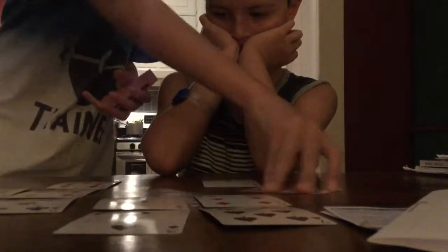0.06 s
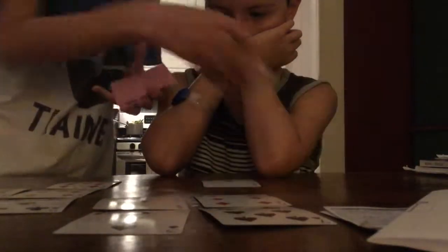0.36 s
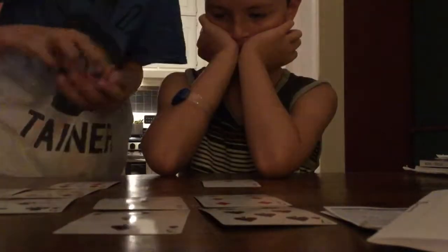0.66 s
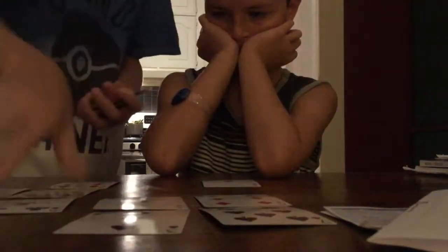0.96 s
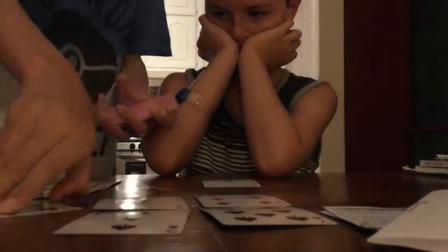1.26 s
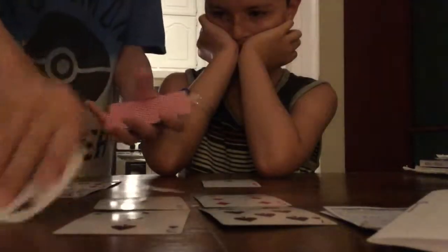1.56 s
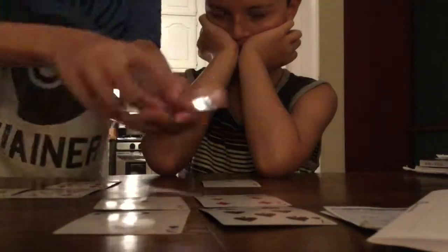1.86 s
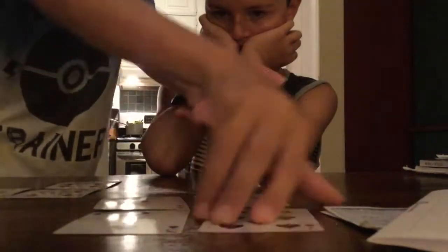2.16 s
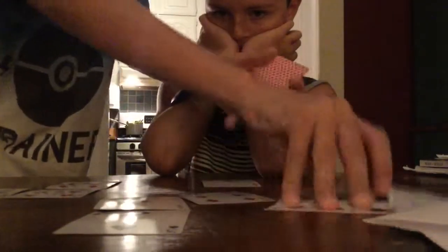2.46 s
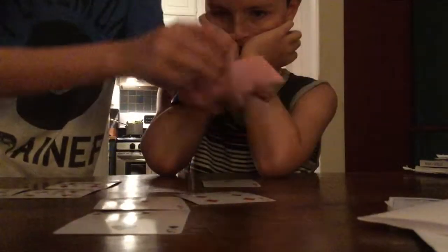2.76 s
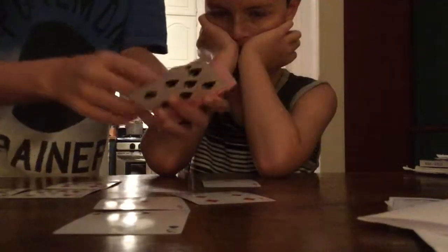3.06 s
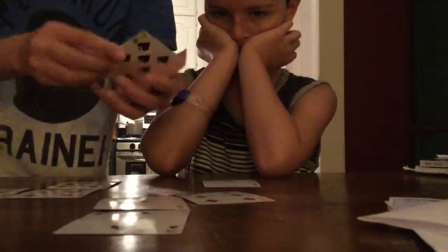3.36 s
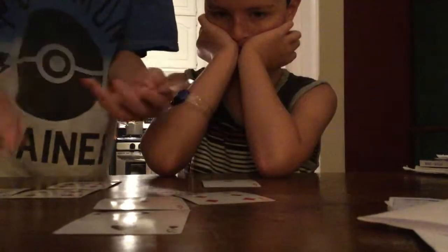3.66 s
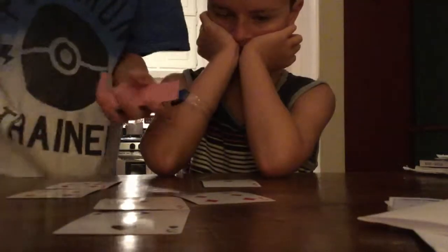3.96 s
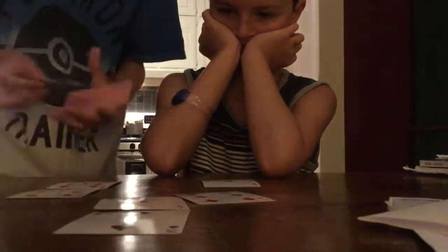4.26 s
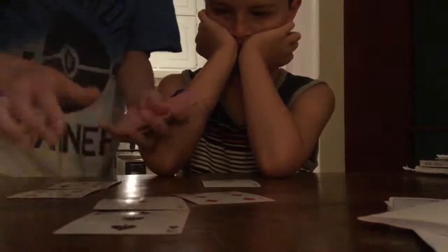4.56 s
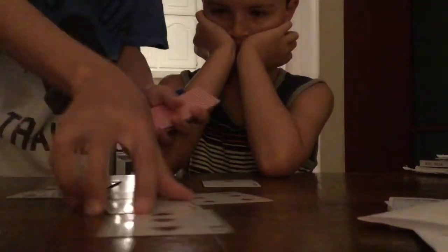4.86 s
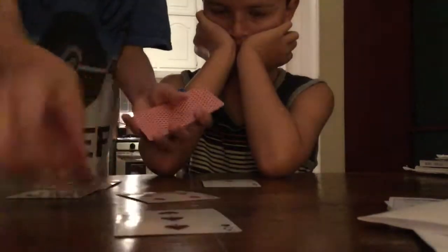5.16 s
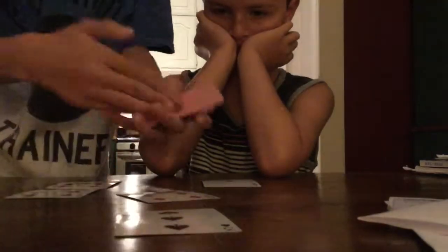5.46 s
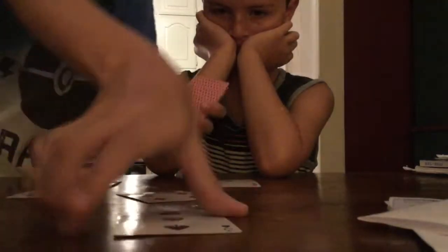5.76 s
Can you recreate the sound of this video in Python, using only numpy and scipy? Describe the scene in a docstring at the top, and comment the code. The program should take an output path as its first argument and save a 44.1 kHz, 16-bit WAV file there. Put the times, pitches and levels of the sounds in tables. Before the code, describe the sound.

Soft finger knocks, short slides and crisp flicks as playing cards are picked up from a wooden table in a small room.

```python
"""Gathering playing cards

Cards are picked up one by one from a wooden table in a small, hard-walled room. Fingers land on the
wood and drag a card along, hissing. Its edge scrapes, flicks free and snaps, the bent card flaps, and
it is rubbed into the pack in the other hand. The room hums faintly and rings after each snap."""
import sys
import numpy as np
from scipy import signal
from scipy.fft import rfft, irfft
from scipy.io import wavfile
from scipy.ndimage import uniform_filter1d

SR = 44100
rng = np.random.default_rng(int(sys.argv[2]) if len(sys.argv) > 2 else 0)


def transcribe(signal):
    """Save signal, clipped to [-1, 1], as a 16-bit WAV file at the path in sys.argv[1]."""
    frames = np.atleast_2d(signal).T
    limited = np.clip(frames, -1, 1)
    pcm = np.round(limited * 32767).astype(np.int16)
    wavfile.write(sys.argv[1], SR, pcm)


N = 255780
HZ = np.fft.rfftfreq(N, 1 / SR)
TIME = np.arange(N) / SR

# the tone of a scraping card: (frequency [Hz], level [dB])
SCRAPE_TONE = [(60, -33.5), (160, -11.5), (350, -15), (750, -6.5), (1150, -6), (1700, -2.5), (3000, 1),
               (4200, 0), (7000, -4), (10000, -7), (16000, -13)]


def amp(db):
    """Turns decibels into a number to multiply a sound by."""
    return 10 ** (np.asarray(db) / 20)


def unit(x):
    """Scales a sound to an average strength (rms) of 1."""
    return x / np.sqrt(np.mean(x ** 2) + 1e-20)


def read(points, hz):
    """Looks up frequencies in a table, sliding between its rows on a musical (log) scale."""
    f, value = np.transpose(points)
    return np.interp(np.log(hz + 1), np.log(f + 1), value)


def add(mix, s, sound):
    """Mixes a sound in, starting at s seconds."""
    start = round(s * SR)
    sound = sound[max(-start, 0):]
    part = mix[max(start, 0):][:len(sound)]
    part += sound[:len(part)]


def shaped(x, gain):
    """Turns each frequency of a sound up or down, then scales the result to strength 1."""
    return unit(irfft(rfft(x) * gain, len(x)))


def click(gain_db):
    """A click with the given tone that starts at once and peaks at 1 (a minimum-phase pulse)."""
    cepstrum = irfft(np.log(amp(gain_db)))
    half = len(cepstrum) // 2
    folded = np.r_[cepstrum[0], 2 * cepstrum[1:half], np.zeros(half)]
    pulse = irfft(np.exp(rfft(folded)))[:half]
    return pulse / abs(pulse).max()


def background(air_db=-69.5, hum_db=-72, hum_hz=159, hum_width_hz=14):
    """Quiet room air with a low, unsteady hum."""
    # the tone of the air: (frequency [Hz], level [dB])
    air_tone = [(30, -36.5), (70, -32), (110, -27.5), (160, 2.5), (250, -11.5), (500, -16.5), (1000, -20),
                (2000, -20.5), (4000, -31.5), (8000, -25), (16000, -31.5)]
    hum = shaped(rng.standard_normal(N), 1 / (1 + ((HZ - hum_hz) / hum_width_hz) ** 2))
    air = shaped(rng.standard_normal(N), amp(read(air_tone, HZ)))
    return amp(air_db) * air + amp(hum_db) * hum


def room_echo(gap_s=0.0042, build_s=0.0026):
    """The room's answer to a click: a few clear echoes and a wash whose highest notes die first."""
    # how long the room rings: (frequency [Hz], time to fade by 60 dB [s])
    ring_times = [(100, 0.71), (300, 0.38), (1000, 0.47), (2500, 0.36), (4500, 0.48), (8000, 0.38),
                  (16000, 0.3)]
    # the tone of the wash: (frequency [Hz], level [dB])
    wash_tone = [(100, 0), (300, 9.5), (1000, 1.5), (2500, 3), (6000, 2.5), (10000, 0.5), (16000, 2.5)]
    # bounces off the table, bodies and walls: (typical delay [s], level [dB])
    bounces = [(.0041, -13), (0.0096, -12), (0.012, -12), (0.0162, -13.5), (.026, -26.5)]
    hz, when, noise = signal.stft(rng.standard_normal(SR), SR, nperseg=256)
    decay = amp(read(wash_tone, hz)[:, None] - 60 * when / read(ring_times, hz)[:, None])
    fade_in = 1 - np.exp(-np.maximum(TIME[:SR] - gap_s, 0) / build_s)
    echo = signal.istft(noise * decay, SR)[1][:SR] * fade_in
    echo /= np.sqrt(2 * np.sum(echo ** 2))
    for delay, db in bounces:
        add(echo, delay * rng.uniform(.94, 1.06), amp([db]))
    return echo


def room(x, count=5, step_s=.023):
    """Blends between several random echoes, so the room fades smoothly with no fixed ringing tone."""
    echoes = np.zeros(N)
    for k in range(count):
        apart = abs((TIME / step_s - k + count / 2) % count - count / 2)
        share = np.cos(np.pi / 2 * np.minimum(apart, 1))  # blends without a dip in power
        echoes += signal.fftconvolve(x * share, room_echo())[:N]
    return echoes


def room_share(level_db, usual_db=-30):
    """Louder card sounds are nearer the microphone, so their share of echo (in dB) is smaller."""
    return -6 - 0.15 * (level_db - usual_db)


def squeaks(room_db=-2, jitter=0.014, sag=0.0086):
    """Regular sticking and slipping, as of a finger on a glossy card, gives a thin, short tone."""
    # (start [s], length [s], pitch [Hz], level [dB])
    slides = [(0.14, 0.03, 741, -55), (.458, 0.076, 803, -51.5)]
    # the tone's parts at 1, 2, 3... times the pitch: (level [dB])
    harmonics = [-3.5, -3, -1, 1.5, -5.5]
    for s, length, hz, level_db in slides:
        t = np.arange(0, length, 1 / SR)
        waver = 1 + jitter * unit(uniform_filter1d(rng.standard_normal(SR), size=150))[:len(t)]
        cycles = np.cumsum(hz * (1 - sag * (t / length - .5)) * waver) / SR
        tone = sum(amp(db) * np.cos(2 * np.pi * (k + 1) * cycles) for k, db in enumerate(harmonics))
        yield s, amp(level_db) * signal.windows.tukey(len(t), .5) * unit(tone), room_db


def knocks(room_db=-10, build_cycles=1.9):
    """A fingertip makes the table ring; a longer touch leaves only the low notes."""
    # fingers landing: (time [s], level [dB], contact time [s])
    landings = [(0.173, -44.5, 0.0038), (1.005, -27, 0.0073), (2.147, -40.5, .0014), (2.169, -37.5, 0.012),
                (2.427, -40, 0.0044), (3.736, -37, 0.0056), (4.412, -36.5, .001), (4.429, -41.5, 0.00096),
                (5.723, -18, 0.0007)]
    # the table top's own notes: (frequency [Hz], level [dB], time to fade by 60 dB [s])
    wood_notes = [(99, -13.5, 0.11), (151.2, -10.5, 0.16), (214, 5, 0.064), (300, -1.5, 0.074),
                  (338.3, -16.5, 0.24), (360, 7, 0.061), (570, -13, 0.17), (616, -9.5, 0.13),
                  (840, -14, 0.082), (1050, -9.5, 0.046), (1550, -11.5, 0.02)]
    t = TIME[:SR // 3]
    for s, level_db, contact in landings:
        ring = np.zeros(len(t))
        for k, (hz, db, fade_s) in enumerate(wood_notes):
            push = (-1) ** k / (1 + (hz * contact) ** 2)
            swell = 1 - np.exp(-t * hz / build_cycles)  # the wave takes a moment to fill the board
            ring += push * swell * amp(db - 60 * t / fade_s) * np.sin(2 * np.pi * hz * t)
        yield s, amp(level_db) * ring / abs(ring).max(), room_db


def friction(slips_per_s, spread_db, flutter_db):
    """Paper fibres make tiny, uneven slips over a smooth hiss; the grip flutters as the card moves."""
    size = amp(spread_db * np.minimum(rng.exponential(1, N), 4))
    slips = size * rng.choice([-1, 1], N) * (rng.random(N) < slips_per_s / SR)
    grip = shaped(rng.standard_normal(N), (HZ > 20) & (HZ < 160))
    return unit((unit(slips) + rng.standard_normal(N)) * amp(flutter_db * grip))


def drags(dulling_db_per_octave=2):
    """A flat card speeds up and slows, hissing on the varnish while the fingers make the wood rumble."""
    # (start [s], length [s], hiss [dB], brightness at full speed [dB per octave], rumble [dB])
    slides = [(-.05, 0.096, -49, -3, -56), (0.023, 0.13, -48.5, -1.5, -62),
              (0.148, 0.077, -59.5, -6, -49.5), (0.992, 0.17, -55, 5, -49.5),
              (1.182, 0.064, -48.5, -1, -59), (1.278, 0.087, -65.5, 0, -62.5),
              (1.469, 0.12, -47, -3.5, -51), (2.137, .05, -42, -1.5, -42), (2.206, 0.12, -40, 1.5, -45.5),
              (2.306, 0.13, -44.5, -3.5, -52.5), (2.411, 0.14, -45, -2.5, -57), (3.723, .17, -44.5, 4, -50),
              (3.842, 0.16, -41, 7.5, -52), (3.992, 0.14, -48.5, 2.5, -56), (4.801, 0.11, -49.5, -2, -59.5),
              (4.889, .16, -49.5, -0.5, -49), (5.025, 0.15, -52, -4.5, -68.5),
              (5.63, 0.78, -51.5, -5.5, -57)]
    # card on varnish: (frequency [Hz], level [dB])
    hiss_tone = [(300, -10), (600, -13), (1000, -4), (1600, -4.5), (2600, -1), (4200, 3.5), (6500, 3.5),
                 (9000, 3), (12500, -0.5), (16000, -2)]
    # wood under the pressing fingers: (frequency [Hz], level [dB])
    rumble_tone = [(50, -37), (100, -23.5), (200, 0), (340, -1.5), (600, -7.5), (1200, -11), (3000, -18)]
    hiss = shaped(friction(slips_per_s=6000, spread_db=3.5, flutter_db=1.3), amp(read(hiss_tone, HZ)))
    rumble = shaped(friction(slips_per_s=500, spread_db=6, flutter_db=4.5), amp(read(rumble_tone, HZ)))
    octaves = np.arange(-4, 2)  # the hiss is split into bands so its brightness can change
    place = np.clip(np.log2((HZ + 1) / 9000), -4, 1)
    bands = [irfft(rfft(hiss) * np.maximum(1 - abs(place - k), 0), N) for k in octaves]
    out = np.zeros(N)
    for start, length, hiss_db, bright_db, rumble_db in slides:
        on = (TIME > start) & (TIME < start + length)
        speed = abs(np.sin(np.pi * (TIME[on] - start) / length))
        tilt_db = bright_db + dulling_db_per_octave * (1 - speed)  # brighter when slow
        card = sum(band[on] * amp(tilt_db * k) for band, k in zip(bands, octaves))
        out[on] += amp(hiss_db) * speed ** 0.51 * card
        out[on] += amp(rumble_db) * np.sqrt(speed) * rumble[on]
    return out


def chirps(room_db=-4, ring_db=22, swell_s=.0038, width_octaves=0.3):
    """A card catches for an instant, and its slips lock on to one of its own notes."""
    # (time [s], level [dB], pitch [Hz])
    catches = [(.111, -50, 2970), (.139, -46, 3350), (.16, -45.5, 3200), (0.179, -41, 4400),
               (0.569, -35.5, 4000), (2.066, -48.5, 4160), (4.105, -45.5, 3360), (4.126, -38.5, 2760),
               (4.145, -40.5, 2400), (5.069, -48.5, 3430)]
    t = np.arange(-3 * swell_s, 3 * swell_s, 1 / SR)
    freqs = np.fft.rfftfreq(len(t), 1 / SR)
    for s, level_db, hz in catches:
        note_db = ring_db / (1 + (np.log2((freqs + 1) / hz) / width_octaves) ** 2)
        slips = shaped(rng.standard_normal(SR)[:len(t)], amp(read(SCRAPE_TONE, freqs) + note_db))
        yield s + t[0], amp(level_db) * np.exp(-(t / swell_s) ** 2) * slips, room_db


def strokes(lead_s=0.021, pull_fall_s=.013, flick_rise_s=0.0055, flick_fall_s=0.0051):
    """The hand's moves: a pull is a growing scrape that ends in a flick; a rub is one smooth swell."""
    # an edge pulled until it flicks free: (release [s], rise [s], scrape [dB], flick [dB],
    # brightness [dB per octave], card's note [Hz], boost of that note [dB])
    pulls = [(.287, 0.04, -29.5, -20.5, 1.5, 1730, 8), (0.658, 0.018, -39.5, -26.5, -2.5, 2820, 5.5),
             (1.617, 0.046, -37, -18, 0.5, 1895, 14.5), (1.872, 0.041, -42.5, -26.5, -1.5, 3870, 10.5),
             (2.577, 0.025, -23, -20.5, 2, 2090, 6), (4.175, 0.048, -43, -28.5, 0, 4250, 5.5),
             (5.194, 0.042, -43, -32.5, 1, 2170, 8.5)]
    # a card rubbing on others, and last a short noisy burst inside the big snap: (peak time [s], rise [s],
    # level [dB], # brightness [dB per octave], card's note [Hz], boost of that note [dB])
    rubs = [(0.227, 0.0043, -34, -10, 1865, 15), (0.44, 0.069, -49.5, -3.5, 3300, 10.5),
            (0.565, 0.028, -44.5, -4, 3620, 3.5), (0.691, 0.075, -46, 0.5, 3440, 9.5),
            (1.017, 0.003, -37.5, -1, 6070, 2.5), (1.104, 0.017, -43.5, -6, 1650, 4.5),
            (1.63, 0.0035, -26, -2, 7660, 5), (1.9, 0.048, -41.5, -1.5, 2420, 8),
            (2.281, 0.015, -38, 2, 1103, 21.5), (2.373, .033, -34.5, 5, 6780, 7.5),
            (2.856, 0.094, -48.5, 1, 2600, 2), (3.035, 0.038, -49.5, -5, 4160, 11.5),
            (3.101, 0.012, -45, -3.5, 2360, 4.5), (3.167, 0.015, -41.5, -3, 2420, 3),
            (3.329, 0.052, -46.5, -6.5, 2070, 10.5), (3.362, .011, -33.5, -3, 1280, 15),
            (3.401, 0.023, -35.5, 1.5, 4800, 5.5), (3.503, 0.017, -44, 5, 2380, 17.5),
            (3.564, 0.023, -46.5, 5, 4550, 7.5), (4.347, 0.017, -37, -2.5, 2540, 7),
            (4.411, 0.05, -43.5, -3.5, 2850, 4), (4.582, 0.021, -52, -5, 4590, 6.5),
            (5.12, 0.01, -33.5, 1, 2500, 4), (5.288, 0.022, -41, -3, 2440, 4.5),
            (5.3818, 0.0019, -23, 4.5, 1354, 4)]
    for s, rise, scrape_db, flick_db, *tone in pulls:
        yield s - lead_s, rise, pull_fall_s, scrape_db, *tone
        yield s, flick_rise_s, flick_fall_s, flick_db, *tone
    for s, rise, level_db, *tone in rubs:
        yield s, rise, 0.77 * rise, level_db, *tone


def scrapes(width_octaves=0.37, room_db=0.5):
    """Each stroke swells and stops; the bent card boosts the slips' sound around its own note."""
    slips = friction(slips_per_s=3200, spread_db=0.5, flutter_db=2.0)
    for s, rise, fall, level_db, bright_db, card_hz, card_db in strokes():
        on = (TIME > s - 3 * rise) & (TIME < s + 3 * fall)
        t, hz = TIME[on] - s, np.fft.rfftfreq(on.sum(), 1 / SR)
        octave = np.log2(np.maximum(hz, 400) / card_hz)
        note_db = card_db * np.exp(-(octave / width_octaves) ** 2)
        scrape = shaped(slips[on], amp(read(SCRAPE_TONE, hz) + bright_db * octave + note_db))
        swell = np.exp(-(t / np.where(t < 0, rise, fall)) ** 2)
        yield TIME[on][0], amp(level_db) * swell * scrape, room_db + room_share(level_db)


def flaps(room_db=-7, rise_cycles=0.315, linger=1.65):
    """A bent card flips its curve and pumps the air for a cycle or two: a soft flap."""
    # (peak time [s], level [dB], pitch [Hz])
    flips = [(0.551, -34, 560), (0.661, -30, 406), (1.631, -34.5, 300), (1.874, -32, 377),
             (2.5826, -23, 780), (2.586, -31.5, 280), (2.7422, -24.5, 305), (2.7457, -11.5, 1000),
             (2.83, -37, 310), (4.184, -26, 400), (4.185, -22, 1250), (5.3805, -11, 1256),
             (5.383, -23.5, 320)]
    for s, level_db, hz in flips:
        rise = rise_cycles / hz
        t = np.arange(-8 * rise, 20 * rise, 1 / SR)
        swing = 1 / np.cosh(t / np.where(t < 0, rise, rise * linger))
        yield s + t[0], amp(level_db) * swing * np.sin(2 * np.pi * hz * t), room_db


def snaps(chatter_s=0.014, body_s=0.013, ring_cycles=31.2, attack_s=0.00013, room_db=2):
    """An edge slips free or strikes: it cracks and chatters, and the card rings briefly."""
    # (time [s], ring level [dB], ring pitch [Hz], crack level [dB])
    strikes = [(0.2853, -20.5, 2780, -37), (.549, -26.5, 2926, -19), (1.566, -22.5, 3200, -27),
               (1.6143, -20, 1750, -10.5), (1.6164, -22.5, 2020, -33), (1.656, -24.5, 3340, -45),
               (1.805, -28, 3570, -15), (1.843, -28.5, 3160, -17.5), (2.1469, -33, 3136, -35),
               (2.498, -42, 2770, -26.5), (2.5444, -5.5, 7000, -12), (2.5784, -45, 2680, -31),
               (2.6132, -18, 9000, -30), (2.7383, -19, 2090, -19), (2.822, -19.5, 2550, -14),
               (2.973, -27.5, 2280, -20.5), (3.2651, -37, 1810, -33), (3.277, -40, 2620, -27),
               (3.289, -25.5, 2710, -27), (3.310, -32.5, 2360, -28), (3.483, -33, 2550, -24.5),
               (3.541, -36.5, 4250, -23.5), (3.553, -27.5, 4690, -21), (3.7327, -46, 2860, -23.5),
               (3.7383, -35, 4100, -28.5), (4.3215, -23.5, 2630, -20.5), (4.818, -54, 3500, -33),
               (4.8478, -35, 3600, -19), (5.0576, -30.5, 3360, -25.5), (5.1157, -40, 2690, -29),
               (5.1861, -23, 2058, -26), (5.1952, -18, 6800, -23), (5.3789, -8.5, 1754, -5.5),
               (5.3805, 0, 2482, -31), (5.7235, -32.5, 2000, -33)]
    # the tone of the crack: (frequency [Hz], level [dB])
    crack_tone = [(80, -16), (300, 2.5), (700, -4.5), (1500, -4), (3000, -2), (6000, -2.5), (10000, -11.5),
                  (16000, -7)]
    t = TIME[:SR // 20]
    pulse = click(read(crack_tone, np.fft.rfftfreq(2048, 1 / SR)))
    freqs = np.fft.rfftfreq(len(t), 1 / SR)
    for s, ring_db, hz, crack_db in strikes:
        chatter = 0.35 * rng.standard_normal(len(t)) * amp(-60 * t / chatter_s)
        crack = amp(crack_db) * signal.fftconvolve((t == 0) + chatter, pulse)[:len(t)]
        near_note = 1 / (1 + (2 * np.log2((freqs + 1) / hz)) ** 4)
        weak_notes = shaped(rng.standard_normal(len(t)), near_note) * amp(-60 * t / body_s)
        main_note = np.sin(2 * np.pi * hz * t) * amp(-60 * t * hz / ring_cycles)
        ring = amp(ring_db) * (main_note + 0.365 * weak_notes) * (1 - np.exp(-t / attack_s))
        yield s, ring + crack, room_db + room_share(max(ring_db, crack_db))


def scene(drag_db=-2.0, drag_room_db=-7):
    """Cards on the table are close and clear; cards in the hand are farther off and echo more."""
    direct = amp(drag_db) * drags()
    to_room = amp(drag_room_db) * direct
    for source in (scrapes, chirps, snaps, flaps, knocks, squeaks):
        for s, sound, room_db in source():  # start time, sound, share sent into the room
            add(direct, s, sound)
            add(to_room, s, amp(room_db) * sound)
    return (direct + room(to_room) + background())[None]


def noise_suppressor(x, depth_db=16, knee_db=7.5):
    """Turns down each band of frequencies while it is about as quiet as the background noise."""
    # where the cut is half its depth: (frequency [Hz], level per band [dB])
    threshold = [(100, -112), (900, -107), (1500, -93), (2600, -99.5), (4000, -77.5), (8000, -87),
                 (16000, -95)]
    hz, _, bands = signal.stft(x, SR, nperseg=1024)
    power = uniform_filter1d(abs(bands) ** 2, size=21, axis=1)  # smooth across frequency
    power = uniform_filter1d(power, size=2, axis=2)  # and across time
    over_db = 10 * np.log10(abs(power) + 1e-20) - read(threshold, hz)[:, None]
    cut_db = depth_db * (1 - np.tanh(over_db / knee_db)) / 2
    return signal.istft(bands * amp(-cut_db), SR)[1][:, :N]


def record(dry, low_cut_hz=105, high_cut_hz=15900, ceiling=.92):
    """A small microphone drops deep bass, turns down noise, clips peaks and loses the top treble."""
    thin = signal.sosfilt(signal.butter(3, low_cut_hz, "high", fs=SR, output="sos"), dry)
    clipped = np.clip(noise_suppressor(thin), -ceiling, ceiling)
    treble_cut = signal.firwin(511, high_cut_hz, window=("kaiser", 9), fs=SR)
    return signal.oaconvolve(clipped, treble_cut[None], "same")


dry = scene()
out = record(dry)
transcribe(out)
```